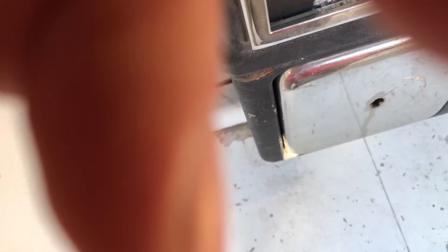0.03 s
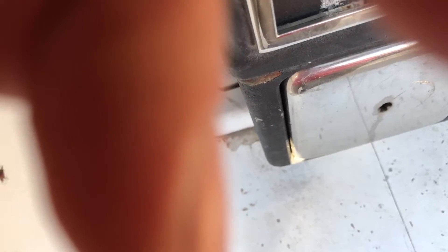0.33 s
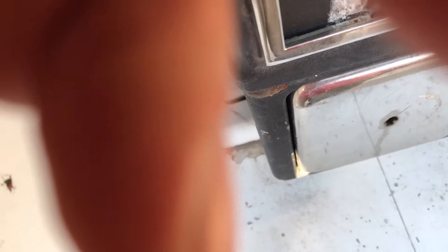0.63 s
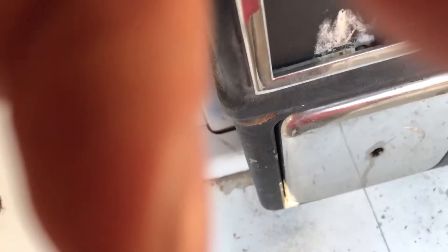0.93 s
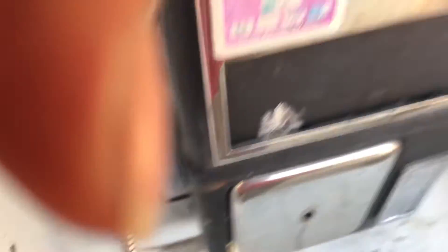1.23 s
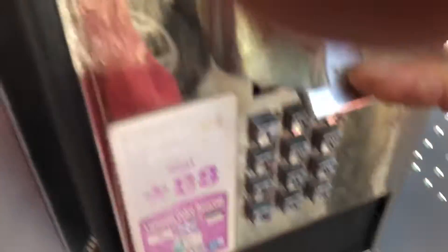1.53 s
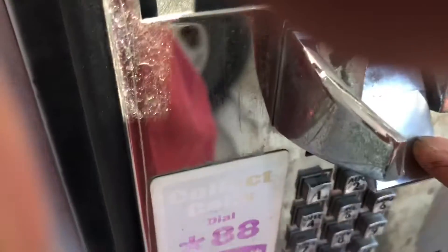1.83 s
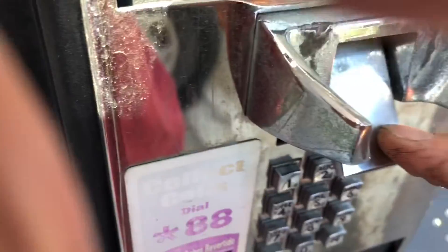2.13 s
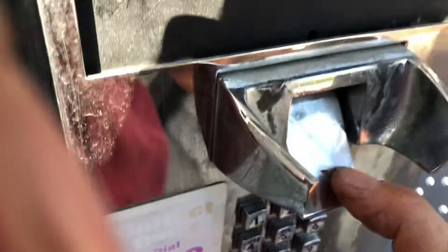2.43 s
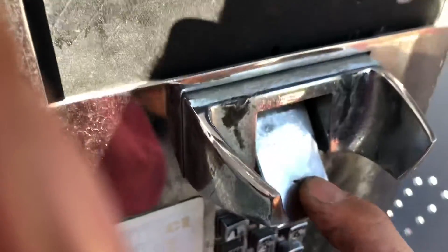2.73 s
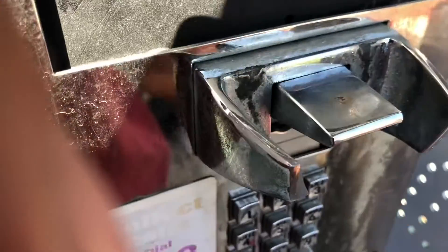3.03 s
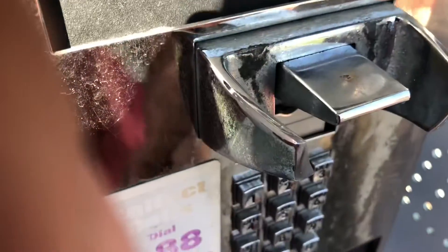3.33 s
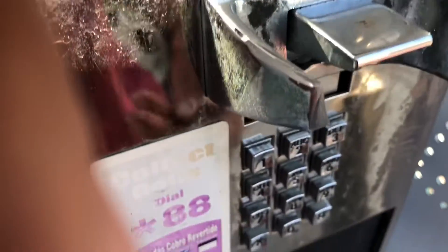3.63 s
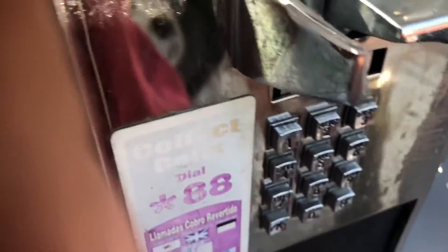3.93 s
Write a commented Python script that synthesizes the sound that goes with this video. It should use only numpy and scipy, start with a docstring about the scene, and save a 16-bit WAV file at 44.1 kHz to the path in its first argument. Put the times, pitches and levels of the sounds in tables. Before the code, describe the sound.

Two sharp metallic payphone clacks, then small parts ticking, over steady street traffic rumble.

```python
"""A payphone beside a street, heard from arm's length. Its mechanism clacks once, and three seconds later
the sprung lever snaps up: each impact gives a hard crack and excites the modes of the steel housing,
which boom and ring. Small metal parts then slide, tick and jingle; earlier, a hand rubs faintly.
Engines idle in low tones and an approaching vehicle drones, while the broadband rumble and hiss of
traffic excite resonances of the booth and of the hollow between hand and booth."""
import sys
import numpy as np
from scipy import signal
from scipy.io import wavfile

SR = 44100
rng = np.random.default_rng(int(sys.argv[2]) if len(sys.argv) > 2 else 0)


def dump_mix(stems):
    """Bounce the given channels to the path in sys.argv[1] as a 16-bit WAV at rate SR."""
    frames = np.atleast_2d(stems).T  # one column per channel
    limited = np.clip(frames, -1, 1)  # hard clip at full scale
    pcm = np.round(limited * 32767).astype(np.int16)
    wavfile.write(sys.argv[1], SR, pcm)


N = 176400
TIME = np.arange(N) / SR
BANDS_HZ = 1000 * 2 ** (np.arange(-15, 13) / 3)  # third-octave centres
HALF_BAND = 2 ** (1 / 6)  # ratio of band edge to centre

# spectrum of a small metal part's tick: frequency_hz, level_db, t60_s
TICK_SPECTRUM = [(2000, -39, 0.026), (4000, -17, 0.025), (6100, -14, 0.025), (7560, -8, 0.022),
                 (9600, -4.5, 0.015), (11500, -12, 0.023), (13000, -14, 0.027), (15500, -17, 0.022)]


def from_db(db):
    """Amplitude ratio: tenfold for every 20 dB."""
    return 10 ** (np.asarray(db) / 20)


def rms_one(x):
    """Normalisation to unit rms."""
    return x / np.sqrt(np.mean(x ** 2) + 1e-20)


def at_hz(table, hz):
    """Interpolation of a table's columns on a logarithmic frequency axis."""
    freqs, *columns = np.transpose(table)
    return [np.interp(np.log(hz), np.log(freqs), column) for column in columns]


def drift(rate_hz):
    """Slow random fluctuation: low-passed noise of unit rms."""
    step = 40  # samples between computed points
    pole = np.exp(-2 * np.pi * rate_hz * step / SR)
    noise = rng.standard_normal(N // step + 2002)
    slow = signal.lfilter([1], [1, -2 * pole, pole * pole], noise)[2000:]
    return np.interp(np.arange(N) / step, np.arange(len(slow)), rms_one(slow))


def band_noise(hz, size):
    """Band-limited noise, a third of an octave wide, of unit rms."""
    sos = signal.butter(3, [hz / HALF_BAND, hz * HALF_BAND], "band", fs=SR, output="sos")
    return rms_one(signal.sosfilt(sos, rng.standard_normal(size + 4000))[-size:])


def resonance(hz, width_hz):
    """Forced response of a resonator to white noise, at unit rms."""
    b, a = signal.iirpeak(hz, hz / width_hz, fs=SR)
    return rms_one(signal.lfilter(b, a, rng.standard_normal(N)))


def add(out, start_s, sound):
    """Superposition of a sound on the mix from a given time."""
    start = max(int(start_s * SR), 0)
    out[start:start + len(sound)] += sound[:N - start]


def burst(spectrum, rise_s, tilt_db, size):
    """Modal overlap: crowded modes struck together act as noise bands, each decaying at its own rate."""
    t, out = TIME[:size], np.zeros(size)
    for hz in BANDS_HZ[BANDS_HZ >= spectrum[0][0] / HALF_BAND]:
        db, t60 = at_hz(spectrum, hz)
        envelope = (1 - np.exp(-t / rise_s)) * from_db(-60 * t / t60)
        band = band_noise(hz, size) * envelope
        octaves = np.log2(hz / spectrum[len(spectrum) // 2][0])
        out += rms_one(band) * np.sqrt(np.mean(envelope ** 2)) * from_db(db + tilt_db * octaves)
    return out


def ring(hz, t60, rise_s):
    """Damped oscillation: one mode builds up, then decays exponentially."""
    t = TIME[:SR // 2]
    tone = np.sin(2 * np.pi * (hz * t + rng.random()))
    return tone * (1 - np.exp(-t / rise_s)) * from_db(-60 * t / t60)


def crack(place):
    """Brief metal contact has a broad spectrum, coloured by place: 0 = mechanism, 1 = lever stop."""
    # contact spectrum at the two places: frequency_hz, mechanism_db, lever_db, t60_s
    contact_bands = [(300, -36, -20, 0.025), (920, -18, -19, 0.021), (1710, -2.5, -2, .03),
                     (2510, -7.5, -16, 0.045), (3260, -7, -2.5, 0.037), (4140, -9.5, -14, 0.037),
                     (5400, -5, -2, 0.03), (6500, -4.5, -8, 0.031), (8000, -2, 3.5, 0.013),
                     (10000, 0, -1, 0.019), (12600, -10, -6, 0.024), (15500, -2.5, -10, .026)]
    spectrum = [(hz, mechanism_db + place * (lever_db - mechanism_db), t60)
                for hz, mechanism_db, lever_db, t60 in contact_bands]
    return burst(spectrum, rise_s=0.00039, tilt_db=0, size=6000)


def clacks():
    """Impact excitation: the point at which the housing is struck sets how strongly each mode rings."""
    # impacts: start_s, crack_db, boom_db, boom_tilt_db_per_octave, place
    impacts = [(0.0, -9.5, -8, 0.5, 0), (3.0138, -10.5, -8.5, 1.5, 0.96)]
    # dense resonances of the housing: frequency_hz, level_db, t60_s
    boom_spectrum = [(110, -42, 0.22), (170, -26, 0.3), (241, -7.5, 0.34), (436, -9, 0.2), (745, -15, 0.21),
                     (1710, -13.5, 0.17), (2830, -17, 0.13), (5000, -18.5, 0.085), (8950, -8.5, 0.06),
                     (15000, -25, 0.063)]
    # distinct modes of housing and lever: frequency_hz, mechanism_db, lever_db, t60_s
    modes = [(198.7, -13.5, -18.5, 0.22), (234.5, -11, -14, 0.26), (258, -12, -16, 0.25),
             (320.3, -14, -23, 0.23), (422.5, -24, -21, 0.29), (530, -28.5, -34.5, 0.68),
             (560, -18.5, -27, 0.23), (640, -17.5, -42, 0.2), (853, -27.5, -35, 0.32),
             (1061.5, -30, -26.5, 0.27), (1179, -28, -21.5, 0.27), (1638, -14, -37, 0.081),
             (1695, -23, -22, 0.11), (1775, -38, -25.5, 0.28), (1906, -35, -25, .2),
             (2470, -19, -41, 0.079), (3285, -34, -18.5, 0.067), (3345, -37, -19, 0.094),
             (3630, -42, -19, 0.087), (4590, -44, -34, 0.19), (5360, -37, -14, 0.045),
             (6740, -24, -22, 0.058), (7850, -26, -17, 0.019), (9260, -26, 2, 0.012),
             (12880, -47.5, -17.5, 0.034)]
    # the lever slips off the finger just before it hits: start_s, level_db
    slips = [(3.0104, -35)]
    rise_cycles, longest_rise_s = 13, 0.01
    out = np.zeros(N)
    for start_s, crack_db, boom_db, tilt_db, place in impacts:
        add(out, start_s, from_db(crack_db) * crack(place))
        boom = burst(boom_spectrum, rise_s=0.017, tilt_db=tilt_db, size=20000)
        add(out, start_s, from_db(boom_db) * boom)
        for hz, mechanism_db, lever_db, t60 in modes:
            gain = from_db(mechanism_db + place * (lever_db - mechanism_db))
            add(out, start_s, gain * ring(hz, t60, min(rise_cycles / hz, longest_rise_s)))
    for start_s, db in slips:
        add(out, start_s, from_db(db) * crack(place=1))
    return out


def engines():
    """Periodic motion of idling engines radiates low tones, slightly modulated in pitch and level."""
    # engine tones: frequency_hz, rms_db
    tones = [(36.4, -45.5), (86.5, -39), (95.6, -47), (109.3, -34.5), (132, -44), (182.2, -41.5),
             (219, -60), (268, -52), (301, -55)]
    speed_wander, flutter_db = 0.00367, 1.4
    engine_time = np.cumsum(1 + speed_wander * drift(rate_hz=1)) / SR
    out = np.zeros(N)
    for hz, db in tones:
        amplitude = np.sqrt(2) * from_db(db + flutter_db * drift(rate_hz=6))
        out += amplitude * np.sin(2 * np.pi * (hz * engine_time + rng.random()))
    return out


def traffic():
    """Incoherent rumble and tyre hiss sum to fluctuating broadband noise, with booth resonances on top."""
    # traffic spectrum: frequency_hz, level_db
    spectrum = [(31, -72), (40, -62), (50, -45.5), (62, -44.5), (80, -47.5), (100, -36.5), (125, -39),
                (160, -48.5), (200, -41.5), (260, -46), (330, -47), (430, -54), (650, -54.5), (1000, -53.5),
                (1250, -53.5), (1650, -51), (2100, -51), (2700, -53.5), (3400, -61), (4300, -61),
                (6400, -60.5), (8500, -65), (10500, -67.5), (13000, -69), (16000, -69.5)]
    # slow level changes by region: time_s, low_mid_db, tyre_hiss_db, presence_db, treble_db
    swells = [(0, 5, -0.5, -4, -4), (.45, -1, 2.5, -3, -0.5), (.9, -1.5, 2, -2, 0), (1.12, 3.5, 0, -2, 0.5),
              (1.25, -1, 0.5, 1, -0.5), (1.6, -0.5, -1.5, 3, 0), (2.2, -2, 0.5, 1.5, 0),
              (2.75, -2.5, -1.5, 3.5, 0.5), (3.25, -0.5, -0.5, 4.5, 1), (3.6, -2, -0.5, 1, -1),
              (3.87, 3.5, 0, 2.5, 0.5), (4, -2, 1.5, 0.5, 1.5)]
    # the bass, which does not swell, then those four regions: centre_hz
    centres_hz = (250, 520, 2400, 4000, 6500)
    # resonances of the booth: frequency_hz, width_hz, rms_db
    booth_modes = [(525, 25, -57), (790, 50, -59), (3490, 40, -66), (5490, 50, -70), (9190, 50, -75),
                   (9680, 60, -76), (10400, 100, -75)]
    flicker_db = 1.56
    times, *levels = np.transpose(swells)
    curves = [np.zeros(N)] + [np.interp(TIME, times, level) for level in levels]
    out = np.zeros(N)
    for hz in BANDS_HZ:
        shares = [np.interp(np.log(hz), np.log(centres_hz), row) for row in np.eye(len(curves))]
        swell_db = sum(share * curve for share, curve in zip(shares, curves))
        band_db = at_hz(spectrum, hz)[0] + swell_db
        out += band_noise(hz, N) * from_db(band_db + flicker_db * drift(rate_hz=9.1))
    for hz, width_hz, db in booth_modes:
        out += from_db(db) * resonance(hz, width_hz)
    return out


def hollow():
    """Cavity resonance: street hiss rings between hand and booth, sinking in pitch as the hand moves."""
    # course of the resonance: time_s, centre_hz, rms_db
    course = [(0, 1720, -52), (.95, 1720, -50), (1.099, 1700, -41.5), (1.25, 1572, -46.5),
              (1.42, 1570, -44.5), (1.65, 1538, -48.5), (2.101, 1538, -50), (2.9, 1597, -50),
              (4, 1560, -50.5)]
    width_hz = 226
    times, hz, db = np.transpose(course)
    lowpass = signal.butter(2, width_hz / 2, fs=SR, output="sos")
    in_phase, quadrature = signal.sosfilt(lowpass, rng.standard_normal((2, N)))
    phase = 2 * np.pi * np.cumsum(np.interp(TIME, times, hz)) / SR
    band = in_phase * np.cos(phase) + quadrature * np.sin(phase)
    return from_db(np.interp(TIME, times, db)) * rms_one(band)


def vehicle():
    """Noise-driven resonances make a soft drone that grows louder as a vehicle draws nearer."""
    # swell of the approach: time_s, gain_db
    approach = [(0, -21), (2.2, -15), (2.8, -2.5), (3.3, -1), (3.85, 1.5), (4, 3)]
    # resonances of the drone: frequency_hz, width_hz, level_db
    modes = [(385, 48, -46), (471, 57, -50.5), (542, 40, -50), (873, 75, -55), (1060, 89, -52)]
    gain_db = np.interp(TIME, *np.transpose(approach))
    drone = sum(from_db(db + gain_db) * resonance(hz, width_hz) for hz, width_hz, db in modes)
    return signal.sosfilt(signal.butter(2, 1500, fs=SR, output="sos"), drone)


def hand():
    """Friction: a hand shifting on the housing gives faint, soft bursts of noise."""
    # rubs: start_s, level_db
    rubs = [(0.442, -43), (.998, -42), (1.574, -38.5)]
    # friction spectrum: frequency_hz, level_db, t60_s
    spectrum = [(1600, -6, .1), (2400, 1, .08), (3300, 1.5, 0.067), (4500, -11, .07), (8000, -15, .06)]
    out = np.zeros(N)
    for start_s, db in rubs:
        add(out, start_s, from_db(db) * burst(spectrum, rise_s=0.0057, tilt_db=-1, size=8000))
    return out


def slides():
    """Sliding contact: parts scrape over each other in a random train of tiny impacts."""
    # spells of sliding: start_s, end_s, level_db
    spells = [(3.192, 3.41, -49), (3.774, 3.89, -45)]
    touches_per_s, scatter_db = 220, 2
    out = np.zeros(N)
    for start_s, end_s, db in spells:
        touches = (rng.random(N) < touches_per_s / SR) & (TIME > start_s) & (TIME < end_s)
        impulses = touches * from_db(db + rng.normal(0, scatter_db, N))
        tick = burst(TICK_SPECTRUM, rise_s=0.0004, tilt_db=2, size=2500)
        out += signal.fftconvolve(impulses, tick)[:N]
    return out


def ticks():
    """Small metal parts have high, short-lived modes; each impact excites them a little differently."""
    # light impacts: start_s, level_db, tilt_db_per_octave
    impacts = [(3.2012, -50, -14), (3.2215, -44, -11), (3.2345, -41, -11), (3.2524, -32.5, -8),
               (3.257, -41, -1), (3.276, -31.5, -2), (3.283, -38, -2), (3.3312, -35, 9),
               (3.3953, -36.5, -1), (3.4139, -20.5, 7), (3.4578, -45, -6), (3.547, -39.5, -2),
               (3.575, -53, -17), (3.6316, -36.5, -1), (3.6405, -44, 0), (3.649, -24.5, 0.5),
               (3.7808, -32, 3), (3.787, -27.5, 16), (3.793, -41, 7), (3.809, -40, 3), (3.8347, -31, 3),
               (3.8418, -24.5, 7), (3.8475, -26, 9), (3.858, -36, -4), (3.9322, -46, -1)]
    # modes of the parts: frequency_hz, level_db, t60_s
    modes = [(6210, -15, 0.051), (8600, -12.5, 0.024), (9300, -3.5, 0.019), (9680, -8, .03),
             (12500, -14, .045), (15330, -18, 0.027), (15900, -23, 0.03)]
    scatter_db, detune, pivot_hz = 2.5, 0.0137, 9250
    out = np.zeros(N)
    for start_s, db, tilt_db in impacts:
        add(out, start_s, from_db(db) * burst(TICK_SPECTRUM, rise_s=0.00031, tilt_db=tilt_db, size=2500))
        for hz, mode_db, t60 in modes:
            gain = from_db(db + mode_db + tilt_db * np.log2(hz / pivot_hz) + rng.normal(0, scatter_db))
            detuned_hz = hz * (1 + rng.normal(0, detune))
            add(out, start_s, gain * ring(detuned_hz, t60, rise_s=0.0004))
    return out


def jingle():
    """Free vibration: one lightly damped part keeps a thin ring after each touch."""
    # touches: start_s, level_db
    touches = [(3.8423, -1), (3.8600, 0), (3.8720, 0)]
    # modes of the part: frequency_hz, level_db, t60_s
    modes = [(9600, -39.5, 0.11), (9400, -48, .11), (15550, -46, .11)]
    out = np.zeros(N)
    for start_s, db in touches:
        for hz, mode_db, t60 in modes:
            add(out, start_s, from_db(db + mode_db) * ring(hz, t60, rise_s=0.001))
    return out


def scene():
    """Superposition of payphone and street in one channel."""
    payphone = clacks() + ticks() + jingle() + slides() + hand()
    street = engines() + vehicle() + traffic() + hollow()
    return (payphone + street)[None]


def record(dry):
    """Soft saturation rounds the peaks; a steep low-pass filter removes the highest treble."""
    ceiling, cutoff_hz = 0.94, 15900
    lowpass = signal.ellip(10, 0.1, 90, cutoff_hz, fs=SR, output="sos")
    return signal.sosfilt(lowpass, ceiling * np.tanh(dry / ceiling))


dry = scene()
out = record(dry)
dump_mix(out)
```